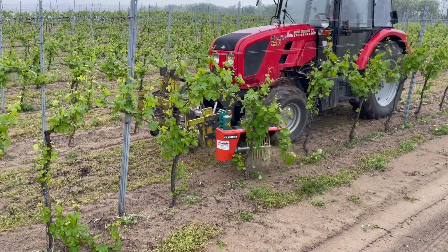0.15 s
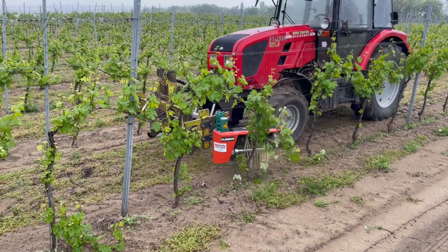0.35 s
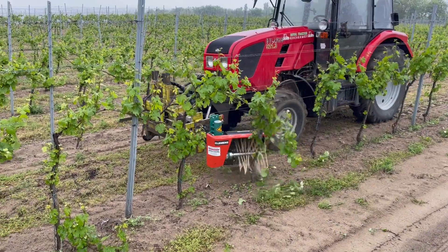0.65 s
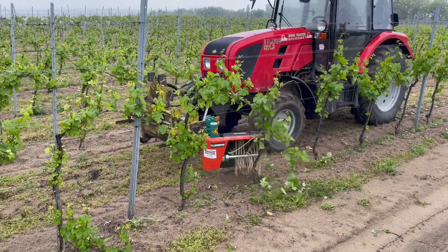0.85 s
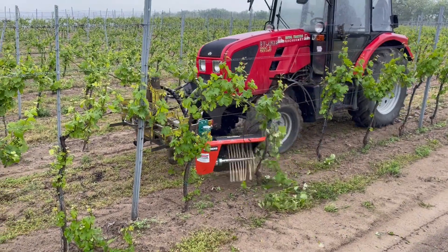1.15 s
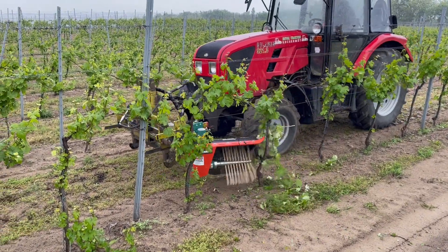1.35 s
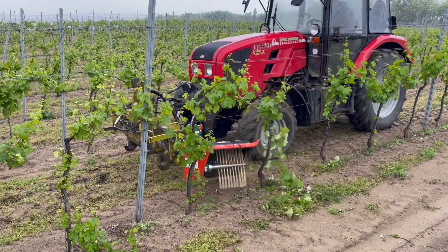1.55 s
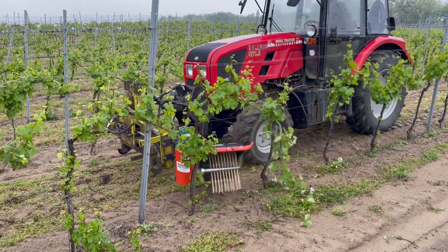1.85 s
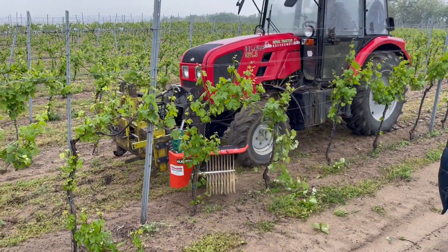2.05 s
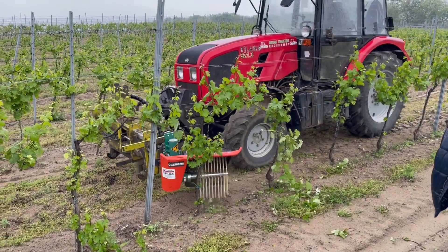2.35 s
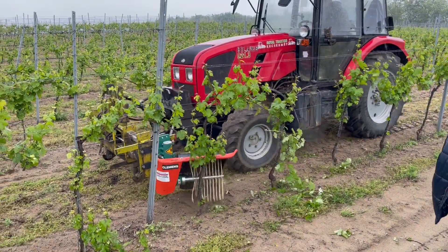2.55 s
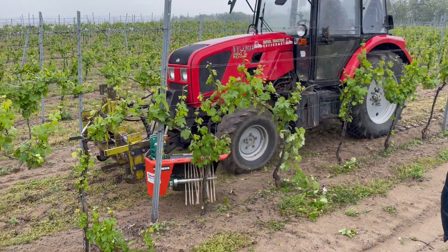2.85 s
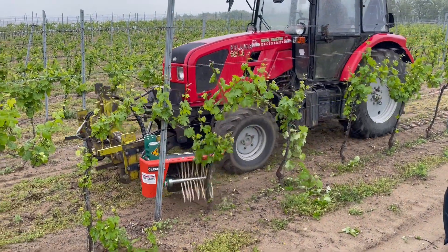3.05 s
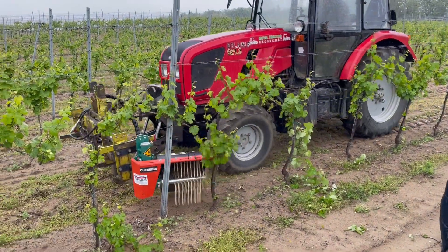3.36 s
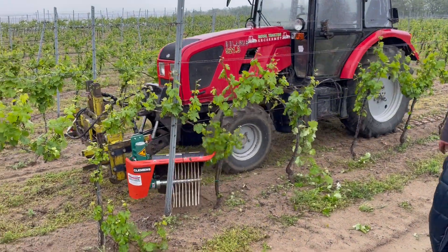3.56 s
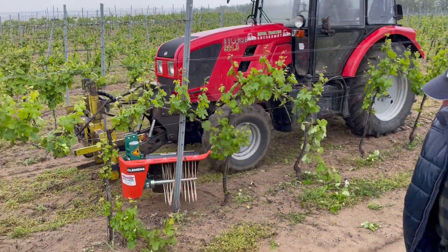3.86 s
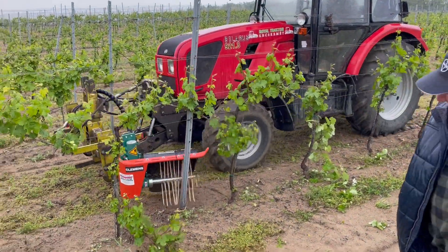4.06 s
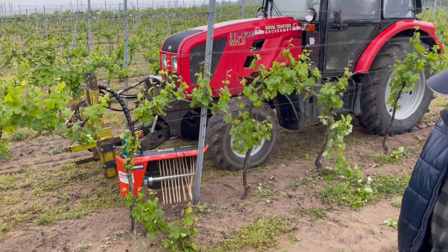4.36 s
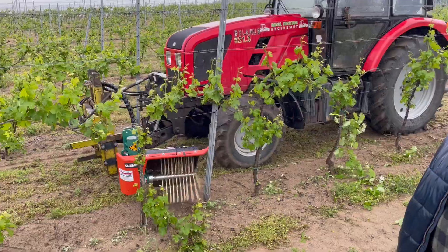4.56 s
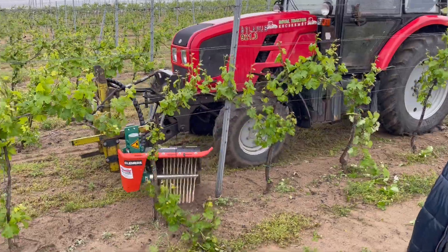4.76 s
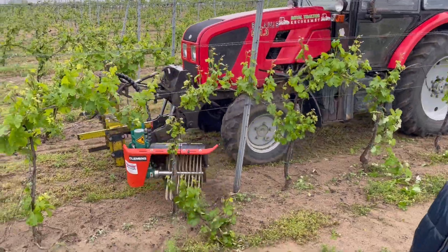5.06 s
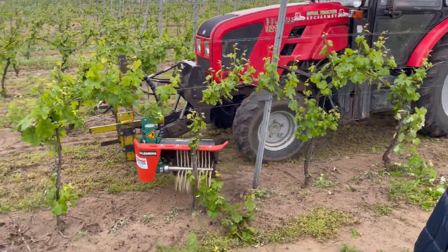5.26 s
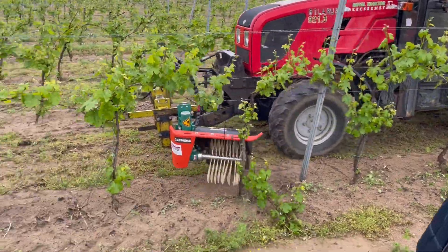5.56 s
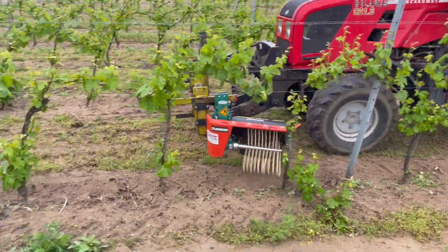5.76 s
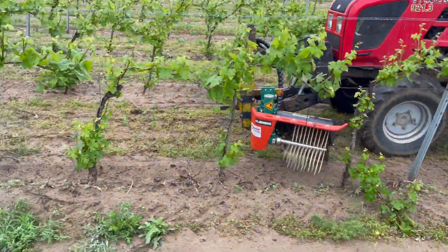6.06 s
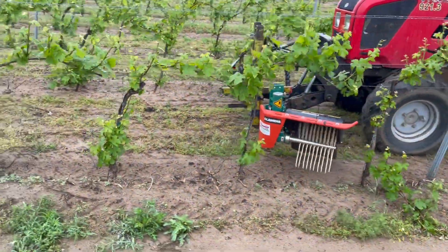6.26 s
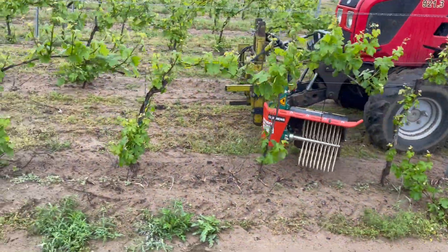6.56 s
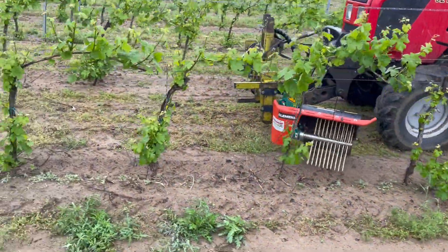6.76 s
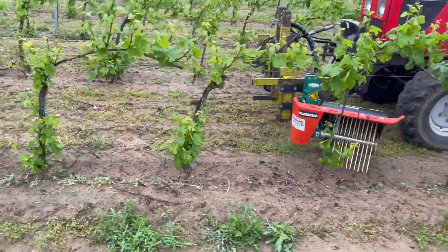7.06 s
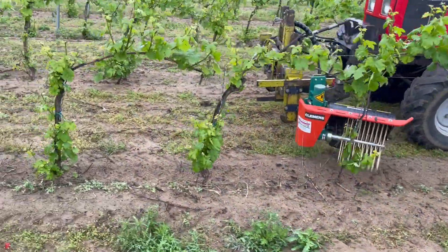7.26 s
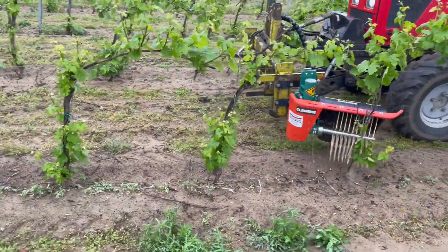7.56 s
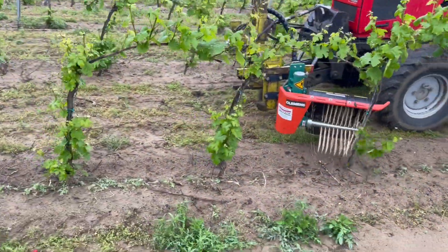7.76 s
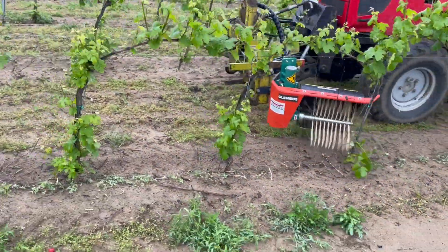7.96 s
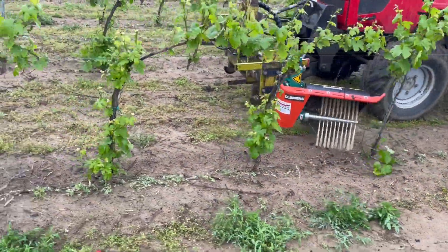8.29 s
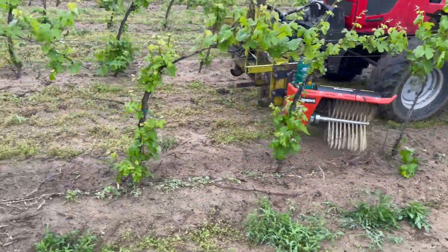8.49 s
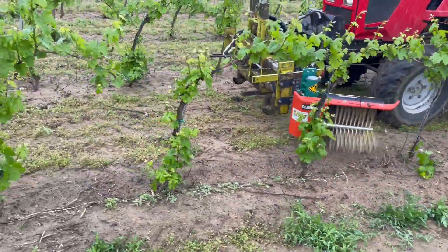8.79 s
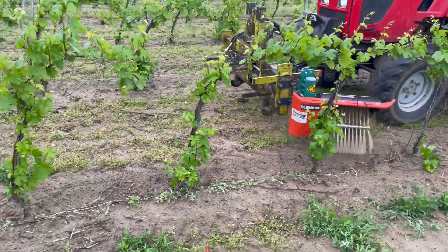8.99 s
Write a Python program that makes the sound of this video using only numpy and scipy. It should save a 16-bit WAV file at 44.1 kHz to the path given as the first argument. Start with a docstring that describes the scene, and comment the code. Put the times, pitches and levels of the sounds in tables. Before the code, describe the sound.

Cords whip and knock against vine stems and scrape a singing metal stake beside a droning tractor; later the motor whines and wind gusts.

```python
"""Vine row, two-port phone microphone a few metres from a creeping diesel tractor; engine and pump run throughout.
From the start a cord rotor thrashes one trunk after another: noise patter, with hard blows ringing wood modes.
From 3.5 to 4.7 s the cords strike a steel post and ring its modes. The rotor motor's tone bank sags under load,
and its whine comes up most clearly from about 6 s. Wind noise rumbles on the ports, with its strongest gust near 8.2 s."""
import sys
import numpy as np
from scipy import signal
from scipy.fft import rfft, irfft, next_fast_len
from scipy.io import wavfile
from scipy.ndimage import uniform_filter1d

SR = 44100
rng = np.random.default_rng(int(sys.argv[2]) if len(sys.argv) > 2 else 0)


def int16_out(signal):
    """Quantize to a 16-bit WAV file."""
    q = np.round(np.clip(np.atleast_2d(signal).T, -1, 1) * 32767)
    wavfile.write(sys.argv[1], SR, q.astype(np.int16))


N = 402633
T = np.arange(N) / SR
SIZE = next_fast_len(N + 8192)
HZ = np.maximum(np.arange(SIZE // 2 + 1) * SR / SIZE, 1)

# rotor working past one plant after another: [touch t/s, swell duration/s, hold duration/s, level at full/dB,
#  level on leaving/dB, knock on wood/dB re lashing, tick peaks/dB re lashing]
PLANT_PASSES = [(0.05, 0.18, .08, -38.5, -57, -1, 14), (0.238, 0.11, 0.71, -40.5, -30.5, -2.5, -2),
                (1.084, 0.018, 0.13, -38, -47, 4, 10), (1.95, 0.21, 0.19, -52, -49, 8.5, 28),
                (2.386, 0.053, 0.82, -38, -34.5, 5, 14), (3.536, 0.018, 0.466, -31.5, -35.5, -4, 7),
                (3.975, 0.13, 0.3, -33, -43.5, 0, 10), (4.54, 0.063, 0.15, -46.5, -56, 4, 21),
                (5.005, 0.33, .28, -41.5, -34, -1, 3), (5.555, 0.02, 0.094, -53, -39, -5, 16),
                (6.37, 0.05, .07, -52, -55, -2, 15), (6.504, 0.15, 0.16, -45.5, -52, -11, 28.5),
                (7.3, 0.36, .22, -38, -39.5, -17, 15), (7.927, 0.027, 0.55, -45, -50, -17, 23),
                (8.4, .16, .03, -45, -40, -20, 20), (8.8, 0.17, .02, -46, -44, -10, 27)]
# colour of the lashing cords: [f/Hz, relative level/dB per Hz]
CORD_COLOUR = [(300, -0.5), (520, 0), (800, -2), (1800, 2), (3500, -5.5), (5500, -5), (8000, 0),
               (11000, -6.5), (16000, -5)]
# knock of cords on wood: [f/Hz, width/Hz, relative level/dB]
WOOD_KNOCK = [(4570, 1450, 16), (2220, 2400, -20)]
# cords on the steel post: [t/s, relative ringing level/dB, upper modes level/dB re ringing]
POST_CONTACT = [(3.52, -48, -3), (3.535, -30, -18), (3.6, -26, -1.5), (3.76, -32, 4.5), (3.81, -37, 9),
                (3.87, -29, 4), (3.91, -27, -1), (3.94, -18, -3.5), (4.0, -28.5, 1), (4.13, -23.5, 0),
                (4.19, -31, -2), (4.265, -24.5, -1), (4.29, -20.5, -15), (4.33, -32, 4), (4.39, -44, 5),
                (4.5, -47, 0), (4.54, -67, 0), (4.66, -56, 0)]
# ringing modes of the steel post: [f/Hz, width/Hz, relative level/dB]
POST_MODES = [(1622, 28, 2.5), (1730, 190, -10.5), (2970, 60, -13), (3590, 90, -12), (3960, 41, -7.5),
              (4140, 91, -5), (4460, 77, -10.5), (5040, 65, -18), (6510, 150, -12), (7170, 330, -14.5),
              (7500, 180, -18), (9100, 120, -14), (11100, 55, -16)]
# single hard blows: [t/s, slap peak level/dB before the struck body colours it, colour f/Hz, tick peak level/dB]
HARD_BLOWS = [(0.0947, -11, 5840, -14), (0.1264, -10, 5800, -30), (0.3067, -11, 5000, -16),
              (0.3306, -8, 5800, -19), (0.395, -4.5, 4860, -20), (0.4384, -14, 2000, -13),
              (0.6417, -9, 6300, -8), (0.6814, -12, 6240, -9), (0.7185, -25, 2140, -5),
              (0.7771, -19, 2000, -22), (0.794, -16, 4210, -10), (0.8131, -21, 2000, -24),
              (0.8455, -12, 6420, -17), (0.8685, -3, 5660, -12), (0.871, -10, 1000, -30),
              (0.8889, -10, 5900, -16), (0.919, -11, 2300, -20), (0.9408, -16, 2500, -18),
              (1.025, -12, 4500, -15), (1.04, -18, 2500, -22), (1.051, -15, 2480, -22),
              (1.061, -7, 4960, -17), (1.074, -1, 3470, -15), (1.0865, 4, 3320, -8), (1.1, -10, 5000, -18),
              (1.113, -8, 5500, -20), (1.1216, -4, 1900, -3), (1.145, -21, 3500, -25),
              (1.1633, 2, 2130, -5), (1.18, -20, 2520, -26), (1.202, -20, 5000, -22),
              (1.2383, 0, 3250, -17), (1.2795, -16, 2300, -31), (1.4501, -22, 4000, -18),
              (2.233, -13, 2330, -23), (2.8025, -5.5, 4450, -5), (2.838, -8, 4500, -14),
              (2.9108, -7, 4620, -10), (2.9281, -11, 4060, -16), (2.9776, -9, 5030, -10),
              (3.0056, -3.5, 4680, -25), (3.0315, -5, 4880, -19), (3.0614, -5, 4240, -22),
              (3.08, -7, 4000, -16), (3.1227, -13, 4020, -22), (3.1532, -4, 4710, -12),
              (3.197, -4, 3000, -22), (3.21, -15, 4560, -21), (3.225, -15, 4250, -24),
              (3.237, -15, 4000, -26), (3.245, 2.5, 4180, -22), (3.251, -3, 3200, -22),
              (3.2732, -4, 4790, -14), (3.311, -16, 5500, -18), (3.3586, -15, 2660, -35),
              (3.5349, -10.5, 2600, -21), (3.715, -16, 3200, -20), (3.7778, -1.5, 4110, -18),
              (3.8646, -12, 4170, -11), (3.9379, -14, 2200, -22), (4.031, -5, 4120, -13),
              (4.0951, -12, 4090, -20), (4.112, -5, 1900, -22), (4.133, -6, 3700, -22),
              (4.22, -9, 3600, -20), (4.3057, -7, 4130, -20), (4.35, -5.5, 2700, -10),
              (4.3834, -13, 4120, -30), (4.4123, -8.5, 4070, -27), (4.4323, -9, 3570, -24),
              (4.4648, -12.5, 4110, -32), (4.49, -15, 1700, -34), (4.5131, -18, 2710, -39),
              (4.5785, -30, 5000, -15), (4.603, -22, 5000, -18), (5.4111, -17, 2330, -15),
              (5.5145, -14, 4160, -11), (5.5662, -8, 2740, -33.5), (5.6301, -16, 4400, -21),
              (5.6545, -5, 4250, -31), (5.665, -12, 4500, -10), (6.43, -23, 4500, -20),
              (6.6298, -30, 5500, -18), (6.772, -32, 5470, -17), (7.8836, -12, 4500, -22),
              (7.8906, -10, 4350, -21), (7.904, -9, 3524, -18), (7.9146, -6, 4120, -18),
              (7.9503, -8, 3440, -27), (7.9633, -6, 3370, -20), (7.968, -13, 3300, -28),
              (8.001, -16, 5000, -19), (8.0483, -25, 5500, -25), (8.0727, -30, 5000, -21),
              (8.0812, -27, 5970, -21), (8.097, -32, 5000, -18), (8.117, -30, 5000, -23),
              (8.162, -30, 5000, -22), (8.171, -30, 5000, -23), (8.179, -32, 5000, -24),
              (8.203, -28, 5500, -26), (8.243, -32, 5000, -26), (8.4274, -30, 5000, -22),
              (8.4623, -31, 5000, -19), (8.5017, -27, 5000, -22), (8.9935, -27, 5000, -17)]
# ringing modes of a vine trunk: [f/Hz, width/Hz, relative level/dB]
TRUNK_MODES = [(950, 250, -12), (1625, 180, 5), (2280, 170, 1), (2800, 180, 2), (3360, 420, -2),
               (3940, 320, -1.5), (4400, 400, -3.5), (4930, 300, -5.5), (5930, 810, -15)]
# speed of the rotor motor, sagging under drag and recovering when free: [t/s, tooth rate f/Hz]
MOTOR_SPEED = [(0, 825), (.45, 820), (1.2, 790), (1.33, 790), (1.42, 810), (1.6, 822), (2.3, 824),
               (2.6, 815), (3.3, 800), (4.5, 805), (4.9, 820), (5.1, 815), (5.5, 783), (5.77, 807),
               (6.15, 823), (6.9, 826), (7.3, 826), (7.55, 810), (7.76, 783), (8.05, 797), (8.5, 793),
               (9.13, 787)]
# motor tones: [multiple of tooth rate, share of the sag followed 0-1, waver/Hz, roughness 0-1,
#  level/dB re its level curve, level column of MOTOR_LEVELS counted from 0 after t]
MOTOR_TONES = [(2.75, 1, 7, .95, 0, 0), (3, 1, 3, .3, 0, 1), (3.17, .3, 8, .95, 0, 2),
               (3.25, 1, 6, .8, -1, 4), (3.5, 1, 5, .4, -6, 3), (4, 1, 4, .35, 0, 3),
               (4.25, 1, 4, .4, -4, 3), (4.5, 1, 6, .5, -3, 5), (5, 1, 5, .4, 0, 5),
               (15, 1, 30, .5, -17, 3)]
# motor tone levels: [t/s, 2.75x level/dB, 3x level/dB, 3.17x level/dB, 4x and neighbours level/dB,
#  3.25x level/dB, 4.5x and 5x level/dB], all re engine body
MOTOR_LEVELS = [(0, -3, -30, -25, -14, -29, -23), (.4, -5, -30, -23, -16, -27, -23),
                (.55, -30, -30, -29, -27, -28, -30), (1.25, -25, -30, -29, -25, -25, -28),
                (1.4, -11, -28, -26, -14, -16, -18), (2.3, -14, -28, -28, -13.5, -9, -20),
                (2.6, -30, -30, -32, -14, -28, -28), (4.7, -30, -30, -25, -26, -27, -30),
                (4.87, -30, -30, -7, -28, -5, -30), (5.05, -30, -30, -27, -30, -25, -30),
                (5.65, -12, -30, -22, -28, -25, -22), (5.85, -8, -22, -8, -16, -23, -20),
                (6.1, -2.5, -18, -9, -12, -14, -19), (6.35, -10, -16, -14, -12, -20, -14),
                (6.6, -6, -12, -5, -16, -12, -22), (6.8, -8, -13, -8.5, -14, -10, -18),
                (7.0, -11, -6.5, -5.5, -23, -4, -25), (7.3, -6, -1.5, -3, -18, -8, -32),
                (7.6, -16, -9, -2.5, -24, -16, -12), (7.78, -17, -6, -14, -24, -11, -14),
                (7.95, -19, -14, -20, -29, -16, -12), (8.35, -7, -9, -12, -20, -7, -16),
                (8.6, -11, -8.5, -20, -10.5, -6, -17), (9.13, -6, -7, -18, -16, -16, -16)]
# tractor as heard at the phone: [t/s, engine body level/dB, gear whine level/dB re body,
#  gearbox rattle level/dB re body, bonnet drumming level/dB re body]
TRACTOR_LEVELS = [(0.0, -26.5, -10, -18, -7), (.42, -27, -19, -9, 0), (.64, -28, -12, -29, -10),
                  (1.07, -25.5, -16, -17, -5.5), (1.22, -30, -12, -11, -13), (1.6, -27, -15, -19, -15),
                  (2.4, -27, -10, -19, -20), (2.7, -27.5, -5.5, -22, -22), (3.1, -26.5, -1.5, -31, -23),
                  (3.61, -27.5, -6, -6, -22), (3.86, -33, -18, -19, -18), (4.29, -32, -12, -11, -17),
                  (4.83, -35, -6, -18, -19), (5.2, -28.5, -4, -10, -33), (5.65, -27.5, -3.5, -18, -22),
                  (5.95, -29.5, -17, -14.5, -13), (6.8, -28.5, -31, -15, -28), (7.4, -28.5, -28, -14, -30),
                  (8.05, -27.5, -16, -15, -14), (8.6, -29, -16, -11.5, -9), (9.13, -29, -12, -13, -11)]
# colour of the engine body: [f/Hz, relative level/dB per Hz]
ENGINE_COLOUR = [(30, -32), (60, -4.5), (150, -10), (250, -5.5), (350, -2.5), (410, -4.5), (450, -10.5),
                 (510, -6), (600, -3.5), (950, -2.5), (1300, -7.5), (1900, -14.5), (2500, -17.5),
                 (3600, -20.5), (4500, -27.5), (7000, -30), (11000, -35.5), (16000, -42)]
# low-middle hollow from the echo off the soil: [t/s, share cancelled 0-1]
SOIL_DIP = [(0, 0.22), (1.2, 0.28), (2.8, 0.2), (3.4, 0), (3.9, 0.27), (4.8, 0.1), (5.4, 0.34), (7.5, 0.16),
            (9.13, 0.07)]
# exhaust hum: [multiple of firing rate, level/dB re body]
EXHAUST_TONES = [(1, -7.5), (1.75, -9), (2, -6), (2.75, -12), (2.999, -12.5), (4, -8), (5, -12), (5.5, -12),
                 (8, -14)]
# pump hum: [multiple of pump rate, level/dB re body at free motor speed]
PUMP_TONES = [(1, 0.5), (2, -5.5)]
# resonances of the rattling gearbox: [f/Hz, width/Hz, relative level/dB]
GEARBOX_MODES = [(2260, 60, -2), (2630, 90, 0), (3300, 90, -9), (3700, 120, -9), (4100, 80, -12)]
# resonances of the drumming bonnet: [f/Hz, width/Hz, relative level/dB]
BONNET_MODES = [(761, 47, -8), (867, 53, -9)]
# wind on the ports: [t/s, rumble level/dB]
WIND_LEVEL = [(0.0, -31), (0.9, -30), (1.35, -35), (1.68, -32), (2.6, -35.5), (3.12, -31.5), (3.25, -26.5),
              (3.66, -40.5), (4.6, -42.5), (5.0, -46), (5.3, -34), (5.92, -32), (6.25, -29), (6.55, -28),
              (6.9, -29.5), (7.2, -27.5), (7.3, -35), (7.38, -26), (7.65, -31), (7.69, -23.5),
              (7.85, -20.5), (7.95, -25.5), (8.08, -18.5), (8.12, -16), (8.2, -12), (8.26, -22.5),
              (8.33, -24), (8.42, -29), (8.5, -35), (9.13, -34.5)]
# colour of the wind rumble: [f/Hz, relative level/dB per Hz]
WIND_COLOUR = [(25, -30), (45, 0.5), (75, 3), (115, 3.5), (200, -6), (350, -17.5), (600, -64)]
# phase between the microphone ports: [f/Hz, lead of left/rad]
PORT_LEAD = [(0, 0), (100, -.3), (500, -.3), (1380, -0.3), (2840, 0.6), (4050, 0.0), (5000, 1.1),
             (5770, -0.5), (6370, -0.5), (7670, -2.8), (8870, -3.6), (11100, -6.3), (12300, -6.5),
             (13900, -8.8), (14600, -9.4), (16100, -9.6)]
# balance between the microphone ports: [f/Hz, left minus right level/dB]
PORT_LEVEL = [(60, 0), (380, 0), (700, -1.5), (1290, -2), (2380, 2), (4400, 2.5), (8120, 0.5),
              (15000, -0.5)]
# stereo width: [f/Hz, level of the left-right difference/dB re direct]
STEREO_WIDTH = [(60, -27), (400, -22), (1000, -9.5), (2500, -7.5), (5000, -5.5), (7000, -3.5),
                (7900, -23.5), (8600, -24), (9500, -4.5), (10600, -26), (11500, -11), (12800, -17),
                (13800, -16), (14700, -24)]

# lashing while running free, on soil and weeds; unevenness; drop at the end of a pass
FREE_DB, FREE_KNOCK_DB, FREE_TICK_DB, TUG_DB, RELEASE_S = -56.5, -5, 7, 1, .035
CORD_ROW_HZ = 25.58  # mean rate of cord rows passing
SQUEAL_DB, SQUEAL_WAVER_HZ = -27, 6  # drive of the cords' slip on steel re post level; stray of its pitch
POST_START_S, POST_END_S = POST_CONTACT[0][0], POST_CONTACT[-1][0]
CRACK_DB, SCRAPE_DB, STEEL_DB = -13.5, -3.5, 13.5  # parts of a slap re its tabled peak
TICKS_PER_S, SMALL_SLAP_DB, TICK_SPREAD_DB = 42, 16, 3.5  # random small blows; peak re lashing; spread
FREE_TOOTH_HZ = 826  # tooth rate of the motor at its free speed
HUM_HZ, HUM_DB = 737, -13  # nominal shaft tone; level re body
FIRING_HZ, PUMP_HZ, GEAR_HZ = 51.7, 126.6, 775.5  # mean firing and gear rates; pump rate at free motor speed
PUMP_SAG_DB_PER_HZ = 0.9  # pump hum lost per Hz of tooth rate below free speed
DIP_HZ, DIP_WIDTH_HZ = 572, 460
FLICKER_DB, GEAR_FLICKER_DB, FLICKER_PER_S = 1, 1.4, 9  # rattle and drumming; gear whine; rate
BUFFET_DB, BUFFET_PER_S = 1.0, 12
FLAP_DB, FLAP_FALL = -5.5, 0.12  # flapping re rumble at its median level; dB it falls behind per dB of rise
WIND_SIDE_DB = -17  # part of the wind that differs between the ports
LIMIT, TOP_HZ = .91, 15900  # ceiling of the rounded peaks (full scale 1); top of the phone's band


def undb(db):
    """Decibels to gain."""
    return 10 ** (np.asarray(db) / 20)


def unit(x):
    """Scale to rms 1."""
    return x / np.sqrt(np.mean(x ** 2))


def over_hz(table):
    """Read a (f/Hz, value) table at every frequency bin, on a log frequency axis."""
    hz, value = np.transpose(table)
    return np.interp(np.log(HZ), np.log(np.maximum(hz, 1)), value)


def over_time(table):
    """Read the columns of a t/s table at every sample."""
    s, *columns = np.transpose(table)
    return [np.interp(T, s, c) for c in columns]


def shape(x, response):
    """Filter by a frequency response."""
    return irfft(rfft(x, SIZE) * response, SIZE)[..., :N]


def modes(table):
    """Response of a set of damped resonances, each peaking at its own f and level."""
    return sum(undb(db) * 1j * HZ * w / (f * f - HZ ** 2 + 1j * HZ * w) for f, w, db in table)


def walk(rate, size=N):
    """Random levels held for 1 / rate s and smoothed twice; spread near 1."""
    hold = int(SR / rate)
    steps = np.repeat(rng.standard_normal(size // hold + 1), hold)
    return 1.3 * uniform_filter1d(uniform_filter1d(steps, hold), hold)[:size]


def tone(hz):
    """Sine whose phase accumulates a changing frequency."""
    return np.sin(2 * np.pi * np.cumsum(hz) / SR)


def lashing():
    """Levels of lashing, knock and ticks: each pass swells, glides through its hold and drops to free running."""
    lash_db, knock_db, tick_db = np.zeros((3, N)) + [[FREE_DB], [FREE_KNOCK_DB], [FREE_TICK_DB]]
    for touch, swell, hold, db_full, db_leave, db_knock, db_tick in PLANT_PASSES:
        corners_s = np.cumsum([touch, swell, hold, RELEASE_S])
        db = np.interp(T, corners_s, [FREE_DB, db_full, db_leave, FREE_DB])
        # the stronger pass also sets the knock and ticks
        knock_db, tick_db = np.where(db > lash_db, [[db_knock], [db_tick]], [knock_db, tick_db])
        lash_db = np.maximum(lash_db, db)
    knock_db = uniform_filter1d(knock_db, size=2000) + 2 * TUG_DB * walk(10)
    return lash_db + TUG_DB * walk(14), knock_db, tick_db


def grains(per_s, spread_db, tail_s):
    """Random contacts of uneven size, each a puff of noise with a sharp start and short tail."""
    size = undb(2 * spread_db * np.minimum(rng.exponential(size=N), 4))
    hit = (rng.random(N) < per_s / SR) * size
    power = signal.lfilter([1], [1, -np.exp(-1 / (tail_s * SR))], hit)  # tail_s is the decay of power
    return unit(np.sqrt(power + 1e-9) * rng.standard_normal(N))


def cords(lash_db, knock_db):
    """Rows of cords lash past in a dense patter that knocks on wood and rings the steel post."""
    row = np.cumsum(CORD_ROW_HZ * (1 + .2 * walk(8.9))) / SR
    beat = 1.5 + np.exp(-(row % 1) / 0.26)
    patter = grains(350 * beat, spread_db=2.5, tail_s=0.002) + 0.43 * rng.standard_normal(N)
    lash = shape(patter, undb(over_hz(CORD_COLOUR)))
    lash = lash / np.std(shape(lash, (HZ > 9800) & (HZ < 13000)))  # lashing level refers to this treble band
    knock = undb(knock_db) * unit(shape(patter, modes(WOOD_KNOCK)))
    return undb(lash_db) * (lash + knock) + post_ring(patter)


def post_ring(patter):
    """Cord blows ring the post; cords slipping along it at the rate of its lowest mode keep it singing."""
    post_db, upper_db = over_time(POST_CONTACT)
    on = (T > POST_START_S) & (T < POST_END_S)
    blows = on * undb(post_db) * patter
    slip = tone(POST_MODES[0][0] + SQUEAL_WAVER_HZ * walk(30))
    rub = on * undb(post_db + SQUEAL_DB + 1.5 * walk(40.3)) * slip
    ring = shape(0.71 * blows + rub, modes(POST_MODES[:2]))
    # blows land at changing heights: three groups of upper modes swell and fade independently
    for k in range(3):
        swelling = undb(upper_db + 1.2 * walk(15)) * blows
        ring = ring + shape(swelling, modes(POST_MODES[2 + k::3]))
    return ring / np.std(shape(patter, modes(POST_MODES) * (HZ < 1750)))


def small_blows(lash_db, tick_db):
    """Smaller blows fall by chance, their strength following the lashing of the moment."""
    gap, size, colour, bright = rng.random((500, 4)).T
    s = np.cumsum(-np.log(1 - gap) / TICKS_PER_S)
    at = np.minimum(s * SR, N - 1).astype(int)
    slap_peak_db = lash_db[at] + SMALL_SLAP_DB + TICK_SPREAD_DB * (2 * size - 1)
    tick_peak_db = lash_db[at] + tick_db[at] + TICK_SPREAD_DB * (2 * bright - 1)
    return np.transpose([s, slap_peak_db, 2200 + 4000 * colour, tick_peak_db])[s < T[-1]]


def slaps(lash_db, tick_db):
    """Single blows ring the trunk or the post; cord tips and thrown grit tick brightly."""
    direct, wood, steel = np.zeros((3, N))
    for s, db, hz, tick_peak_db in [*HARD_BLOWS, *small_blows(lash_db, tick_db)]:
        add_crack(direct, s, tick_peak_db, 9000, 2.2, .007)
        add_crack(direct, s, db + CRACK_DB, 4200, 2.5, .016)
        if POST_START_S < s < POST_END_S:
            add_crack(direct, s, db + SCRAPE_DB, hz, 1.6, .022)
            add_crack(steel, s, db + STEEL_DB, hz, 1.8, .025)
        else:
            add_crack(wood, s, db, hz, 1.7, .019)
    return direct + shape(wood, modes(TRUNK_MODES)) + shape(steel, modes(POST_MODES))


def add_crack(out, s, db, hz, width, t60):
    """Add one decaying burst of noise through a two-pole resonance spanning hz / width to hz * width."""
    t = T[:1400]
    attack = np.minimum(t / (.06 * t60), 1)
    crack = rng.standard_normal(len(t)) * attack * 10 ** (-3 * t / t60)
    r = np.exp(-np.pi * min(hz * (width - 1 / width), 14000) / SR)  # bandwidth stops at 14 kHz
    crack = signal.lfilter([1, 0, -1], [1, -(1 + r * r) * np.cos(2 * np.pi * hz / SR), r * r], crack)
    i = int(s * SR)
    out[i:i + len(t)] += (undb(db) * crack / np.max(np.abs(crack)))[:N - i]


def motor_whine(tooth_hz):
    """Tooth-mesh tones of the rotor motor; uneven load makes them flutter and stray in pitch."""
    levels_db = over_time(MOTOR_LEVELS)
    out = undb(HUM_DB + 2.3 * walk(1.94)) * tone(HUM_HZ + 3 * walk(12))
    for k, share, waver_hz, rough, db, column in MOTOR_TONES:
        flutter = 1 - .6 * rough + rough * walk(160 * rough)
        sagging_hz = FREE_TOOTH_HZ + share * (tooth_hz - FREE_TOOTH_HZ)
        hz = k * sagging_hz + waver_hz * walk(12)
        out = out + undb(db + levels_db[column]) * flutter * tone(hz)
    return out


def hum(phase, orders, fade_db):
    """Harmonic tones locked to a machine's cycle count, each drifting a little in level."""
    out = 0
    for k, db in orders:
        level = undb(db + fade_db + 0.34 * walk(3.6))
        out = out + level * np.sin(2 * np.pi * (k * phase + rng.random()))
    return out


def tractor():
    """Noise clatter pulsed by firings and pump strokes, with exhaust and pump hums, gear and motor whines."""
    body_db, gear_db, *parts_db = over_time(TRACTOR_LEVELS)
    box_db, bonnet_db = (db + FLICKER_DB * walk(FLICKER_PER_S) for db in parts_db)
    tooth_hz, = over_time(MOTOR_SPEED)
    # cycle counts of the firings and of the pump, which slows with the motor
    firings = np.cumsum(FIRING_HZ * (1 + 0.003005 * walk(2))) / SR
    strokes = np.cumsum(PUMP_HZ * tooth_hz / FREE_TOOTH_HZ * (1 + .003 * walk(3))) / SR
    # each firing shakes the casing with its own force, each pump stroke with the same one
    force = undb(4.4 * rng.standard_normal(int(firings[-1]) + 1))[firings.astype(int)]
    gate = 1 + .5 * force * np.exp(-(firings % 1) / 0.54) + 0.24 * np.exp(-(strokes % 1) / 0.66)
    clatter = gate * rng.standard_normal(N)
    body = shape(clatter, undb(over_hz(ENGINE_COLOUR)))
    dip, = over_time(SOIL_DIP)
    body = body - np.clip(dip, 0, 1) * shape(body, modes([(DIP_HZ, DIP_WIDTH_HZ, 0)]))
    body = body / np.std(shape(body, (HZ > 500) & (HZ < 1200)))  # body level refers to this middle band
    box = undb(box_db) * unit(shape(clatter, modes(GEARBOX_MODES)))
    bonnet = undb(bonnet_db) * unit(shape(clatter, modes(BONNET_MODES)))
    sag_db = PUMP_SAG_DB_PER_HZ * (tooth_hz - FREE_TOOTH_HZ)
    hums = hum(firings, EXHAUST_TONES, 0) + hum(strokes, PUMP_TONES, sag_db)
    gear_phase = firings * GEAR_HZ / FIRING_HZ + 0.055 * walk(30)
    gear = undb(gear_db + GEAR_FLICKER_DB * walk(FLICKER_PER_S)) * np.sin(2 * np.pi * gear_phase)
    return undb(body_db) * (body + hums + motor_whine(tooth_hz) + gear + box + bonnet)


def wind():
    """Low, lumpy rumble with a flapping upper part; a weaker, unrelated share differs between the ports."""
    db, = over_time(WIND_LEVEL)
    lumps = undb(1.4 * walk(25)) * rng.standard_normal((2, N))
    rumble = unit(shape(lumps, undb(over_hz(WIND_COLOUR))))
    flap_db = FLAP_DB - FLAP_FALL * (db - np.median(db)) + BUFFET_DB * walk(BUFFET_PER_S)
    flap = undb(flap_db) * unit(shape(lumps, modes([(270, 430, 0)]) ** 2))
    mid, side = undb(db + BUFFET_DB * walk(BUFFET_PER_S)) * (rumble + flap)
    return mid + undb(WIND_SIDE_DB) * side * np.array([[1], [-1]])


def stereo_blur(sound):
    """Short noisy echoes of changing sign and strength, which widen the stereo."""
    t = np.arange(2048) / SR
    blur = 0
    for _ in range(3):
        echo = rng.standard_normal(len(t)) * 10 ** (-3 * t / 0.052)
        echo = echo / np.sqrt(3 * np.sum(echo ** 2))
        blur = blur + signal.fftconvolve(sound * walk(30), echo)[:N]
    return blur


def scene():
    """Rotor and tractor reach two ports with a colour and phase of their own, plus stereo blur and wind."""
    lash_db, knock_db, tick_db = lashing()
    sound = cords(lash_db, knock_db) + slaps(lash_db, tick_db) + tractor()
    side = np.array([[1], [-1]])  # left, right
    ports = undb(side * over_hz(PORT_LEVEL) / 2) * np.exp(.5j * side * over_hz(PORT_LEAD))
    direct = shape(sound, ports)
    # the blur enters the two ports with opposite sign
    width = shape(stereo_blur(sound), ports * side * undb(over_hz(STEREO_WIDTH)))
    return direct + width + wind()


def record(dry):
    """The phone rounds the loudest peaks and cuts the top."""
    rounded = LIMIT * np.tanh(dry / LIMIT)
    return signal.sosfilt(signal.ellip(10, .2, 70, TOP_HZ, fs=SR, output="sos"), rounded)


dry = scene()
out = record(dry)
int16_out(out)
```